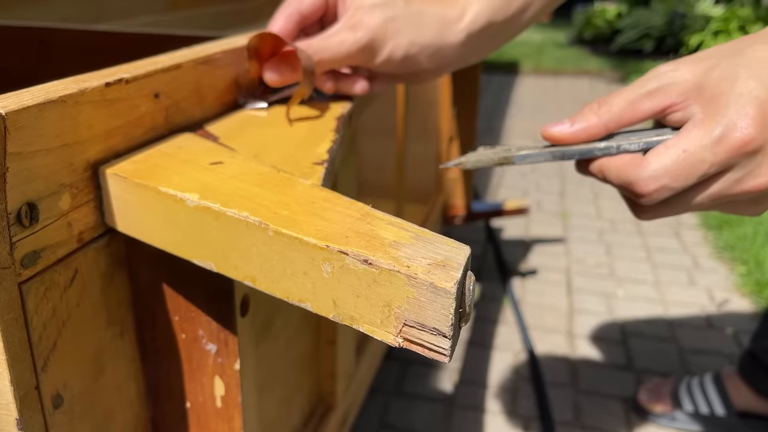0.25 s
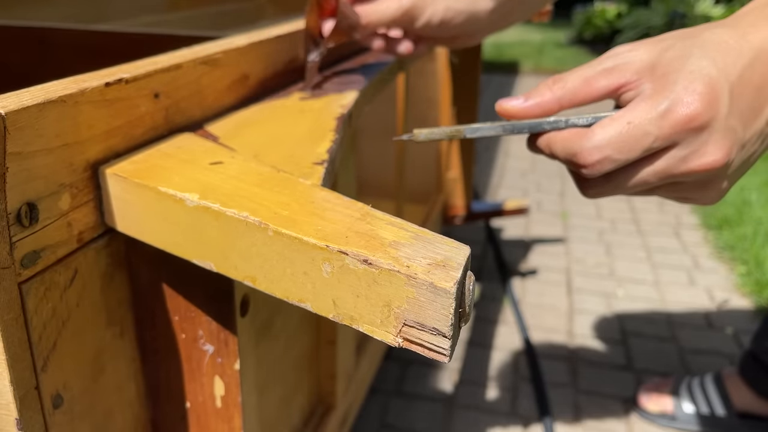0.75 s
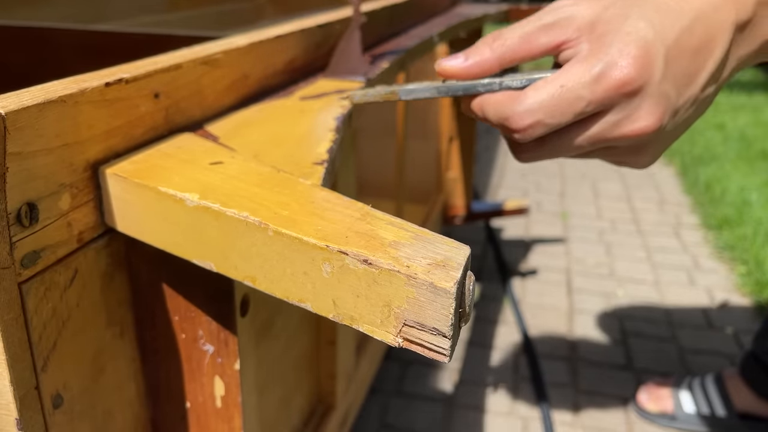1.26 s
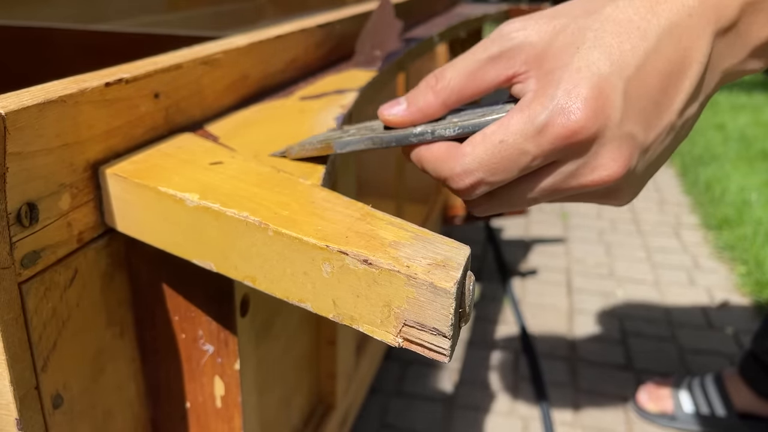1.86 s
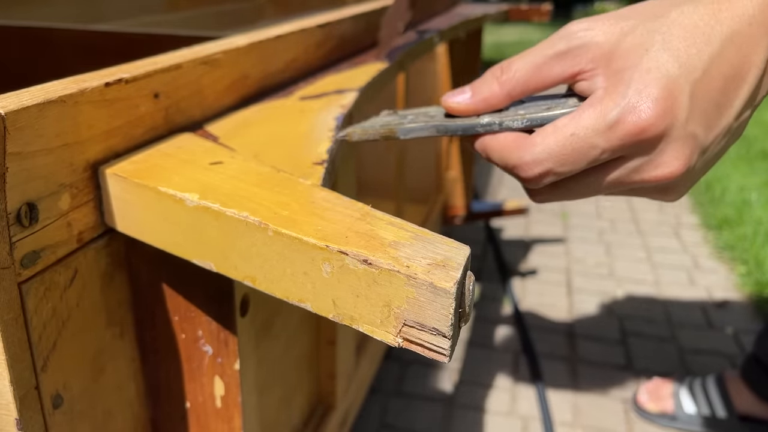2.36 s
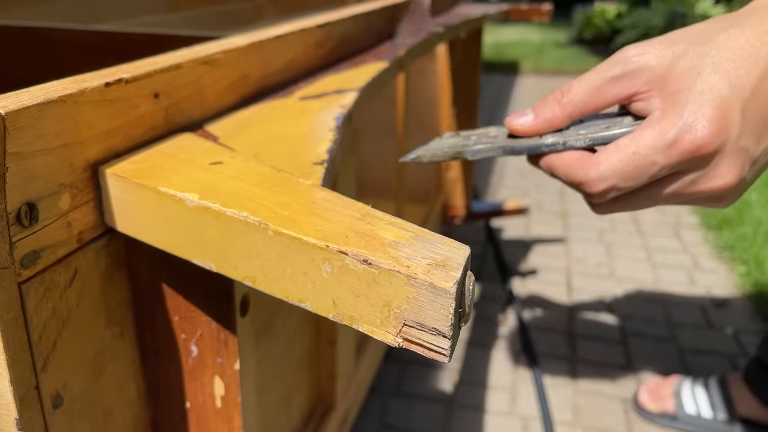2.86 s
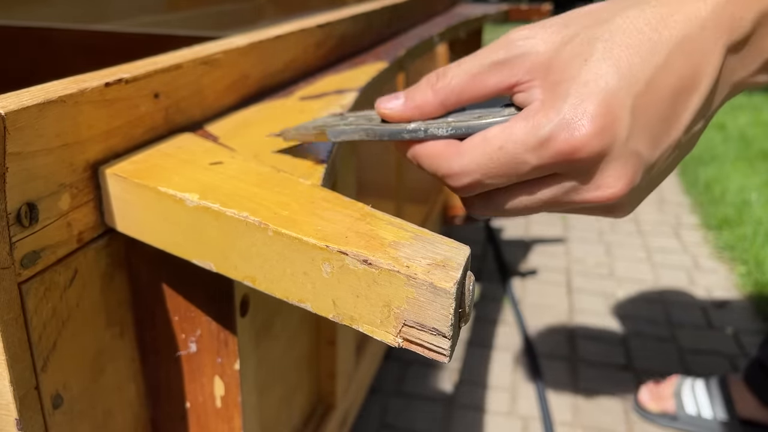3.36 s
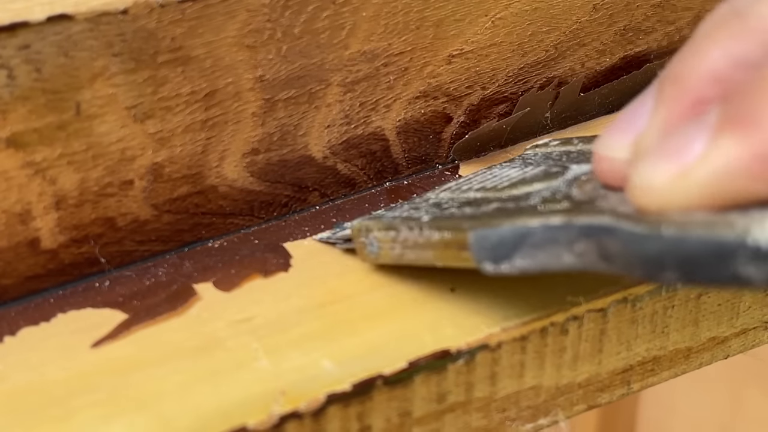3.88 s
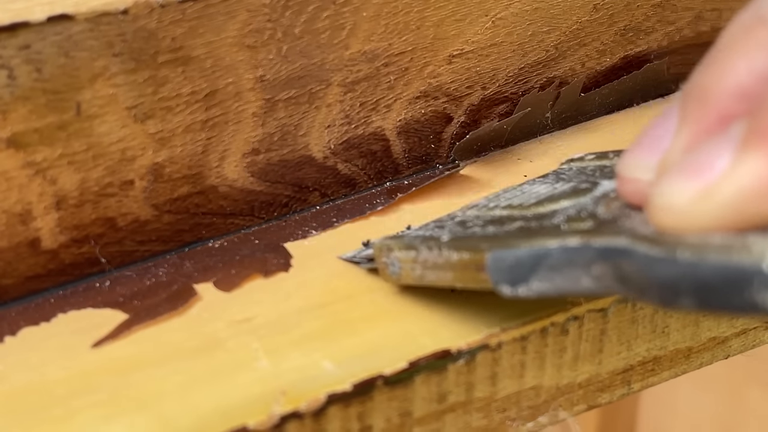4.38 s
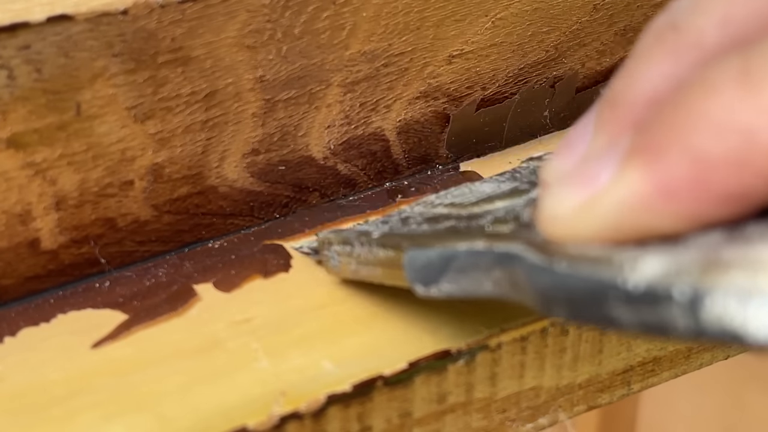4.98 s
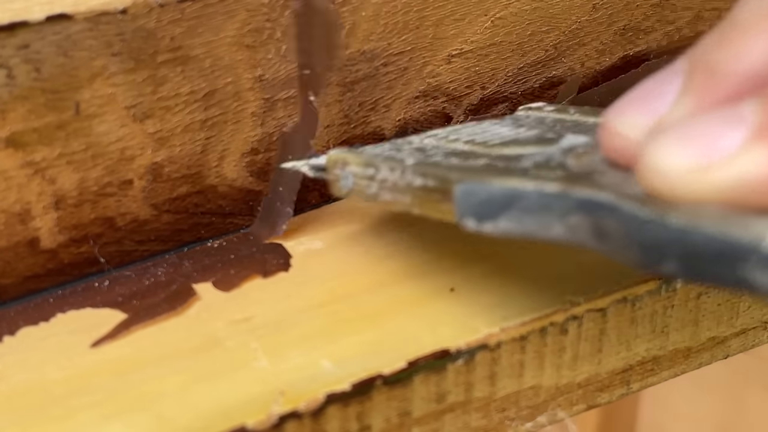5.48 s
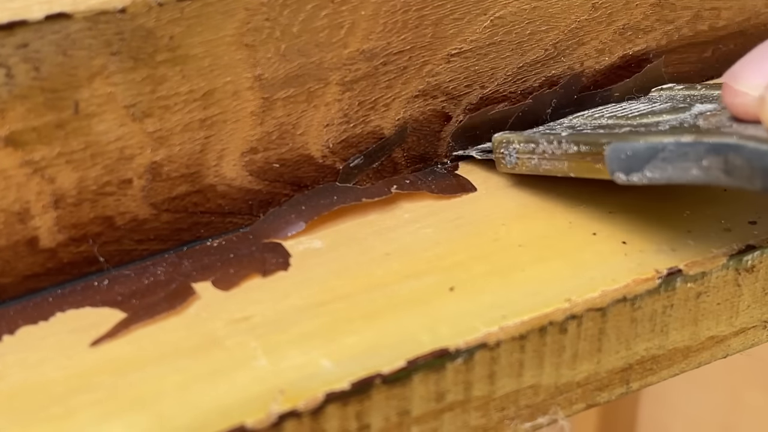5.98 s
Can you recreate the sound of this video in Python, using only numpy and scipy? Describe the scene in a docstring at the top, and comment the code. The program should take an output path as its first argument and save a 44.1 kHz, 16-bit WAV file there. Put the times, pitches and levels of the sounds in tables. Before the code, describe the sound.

Brittle old finish crackles and ticks as it peels off wood, then a razor scraper grinds in quick short strokes with sharp snaps and wooden knocks.

```python
"""Outdoors, over faint hiss and a low rumble that swells in places as the piece is handled, a strip of brittle old
finish is peeled by hand off a wooden frame: beds of tiny cracks swell and fade under single loud ticks. Then a razor
scraper works in quick strokes: a grinding push of gritty noise, snapping flakes (bursts with a brief ring), a jolt
that booms through the wood's decaying modes, and a light draw-back that hisses and squeaks. Two close microphone
ports hear it all."""
import sys
import numpy as np
from scipy import signal
from scipy.fft import rfft, irfft, next_fast_len
from scipy.io import wavfile
from scipy.ndimage import map_coordinates

SR = 44100
rng = np.random.default_rng(int(sys.argv[2]) if len(sys.argv) > 2 else 0)


def generate_wav(signal):
    """Clip the signal to [-1, 1] and save it as 16-bit WAV at the path in sys.argv[1]."""
    frames = np.transpose(np.atleast_2d(signal))
    scaled = np.clip(frames, -1, 1) * 32767
    pcm = np.round(scaled).astype(np.int16)
    wavfile.write(sys.argv[1], SR, pcm)


N = 274743


def amp(db):
    """Decibels to gain."""
    return 10 ** (np.asarray(db) / 20)


def unit(x):
    """Scaled to rms 1."""
    return x / np.sqrt(np.mean(x ** 2) + 1e-20)


def along(points, hz):
    """(Hz, value) points read on a log frequency axis."""
    f, value = np.transpose(points)
    return np.interp(np.log(hz + 1), np.log(f + 1), value)


def curve(rows):
    """(s, value) rows, one value per sample."""
    return np.interp(np.arange(N) / SR, *np.transpose(rows))


def wobble(rate, size):
    """A smooth random curve, rate knots a second."""
    knots = rng.standard_normal(int(size * rate / SR) + 4)
    return map_coordinates(knots, [np.arange(size) * rate / SR])


def filtered(x, response):
    """x times a response of frequency."""
    n = x.shape[-1]
    m = next_fast_len(n + 4096)
    return irfft(rfft(x, m) * response(np.fft.rfftfreq(m, 1 / SR)), m)[..., :n]


def struck(x, level_db):
    """A short sound through a causal (minimum-phase) colour: nothing rings before the blow."""
    n = len(x)
    cepstrum = irfft(np.log(amp(level_db(np.fft.rfftfreq(n, 1 / SR)))), n)
    cepstrum[1:n // 2] *= 2
    cepstrum[n // 2 + 1:] = 0
    return irfft(rfft(x) * np.exp(rfft(cepstrum)), n)


def add(track, s, sound):
    """Mix a sound in at time s."""
    part = track[max(round(s * SR), 0):][:len(sound)]
    part += sound[:len(part)]


def grit(size, rate, spread_db, smooth):
    """Tiny fractures of scattered size, rate a second, over smooth friction noise."""
    hits = (rng.random(size) < rate / SR) * rng.choice([-1, 1], size)
    cracks = hits * amp(spread_db * np.clip(rng.standard_normal(size), -2, 2))
    return unit(cracks) + smooth * rng.standard_normal(size)


def fractures(rows, spectrum, t60, tail_db, tail_t60, ring_db=-7.5, ring_t60=0.019):
    """Each break is a burst of a few ms with a faint tail; flakes with a given pitch also ring briefly."""
    out, t = np.zeros(N), np.arange(4096) / SR

    def early(x):
        """Scaled to rms 1 over the first 3 ms."""
        return x / np.sqrt(np.mean(x[t < .003] ** 2))

    for s, db, body_db, top_db, *flake_hz in rows:
        length = t60 * amp(np.clip(body_db, -25, 6) / 5)  # less body breaks faster
        decay = amp(-60 * t / length) + amp(tail_db - 60 * t / tail_t60)
        burst = rng.standard_normal(len(t)) * decay
        shade = [(3200, body_db), (5500, 0), (8500, 0), (10500, top_db)]
        crack = early(struck(burst, lambda hz: along(spectrum, hz) + along(shade, hz)))
        for hz in flake_hz:
            ring = np.sin(2 * np.pi * hz * t) * amp(-60 * t / ring_t60)
            crack = early(crack + amp(ring_db) * early(ring))
        add(out, s, amp(db) * crack)
    return out


# colour of the outdoor rumble and hiss: [f/Hz, relative level per Hz/dB]
AIR_COLOUR = [(20, -18), (35, -9), (60, 0), (150, -12), (240, -22), (350, -30), (900, -34), (2500, -38.5),
              (6500, -41.5), (10700, -34.3), (12000, -46), (13000, -62)]
# slow rise and fall of the low rumble: [t/s, level/dB], a random wobble rides on top
RUMBLE_LEVEL = [(0, -2.5), (0.6, 3.5), (1.3, 2), (1.42, -2.5), (3.48, -3), (3.62, 6.5), (4.2, 3),
                (5.65, 9.5), (6.2, 1)]


def outdoors(level_db=-43):
    """Low rumble, swelling in places as the piece is handled, under a steady hiss; a little differs between ports."""
    noise = rng.standard_normal((2, N))
    common, apart = filtered(noise, lambda hz: amp(along(AIR_COLOUR, hz)) / (1 + (24 / (hz + 1)) ** 4))
    scale = amp(level_db) / np.std(common)  # set before the rumble swells
    rumble = filtered(common, lambda hz: 1 / (1 + (hz / 160) ** 4))
    common = common + rumble * (amp(curve(RUMBLE_LEVEL) + wobble(1.77, N)) - 1)
    apart_db = [(100, -18), (400, -9), (1500, -5), (5000, -8), (9000, -22)]
    apart = filtered(apart, lambda hz: amp(along(apart_db, hz)))
    return scale * common, scale * apart


def boards(x, level_db=-17, t60=0.085, dull_hz=7000):
    """Nearby boards scatter a brief reflection, different at each port."""
    t = np.arange(SR // 8) / SR
    tail = rng.standard_normal((2, len(t))) * amp(-60 * t / t60) * (t > .002)
    tail = filtered(tail / np.linalg.norm(tail[0]), lambda hz: 1 / (1 + (hz / dull_hz) ** 2))
    return amp(level_db) * signal.fftconvolve(x[None], tail, axes=1)[:, :N]


# soft thumps as the hand settles: [t/s, level before the soft onset and decay/dB]
HAND_THUMPS = [(2.03, -46), (3.452, -38)]


def thumps(rise=0.0049, t60=0.17):
    """A soft contact is a dull puff of noise with no crack."""
    out, t = np.zeros(N), np.arange(SR // 4) / SR
    dull_db = [(150, -6), (420, 5), (900, -9.5), (2500, -19), (4500, -28), (12000, -60)]
    for s, db in HAND_THUMPS:
        puff = unit(filtered(rng.standard_normal(len(t)), lambda hz: amp(along(dull_db, hz))))
        add(out, s, puff * (1 - np.exp(-t / rise)) * amp(db - 60 * t / t60))
    return out


# crackling and rustling swells: pulls on the strip, and at 5.4 s a scraped flake curling up:
# [peak t/s, rise/s, fall/s, crackle level/dB, rustle level/dB], levels before the fast random wobble
CRACKLE_SWELLS = [(0.013, 0.036, 0.051, -30.5, -40), (0.21, 0.1, 0.046, -42, -49),
                  (0.3, .1, 0.34, -44, -69), (0.54, 0.12, 0.17, -42.5, -70), (0.7, 0.063, 0.13, -35, -54),
                  (1.19, 0.18, 0.065, -35.5, -47), (1.63, 0.06, 0.15, -49, -56.5),
                  (1.97, .14, 0.11, -48.5, -55.5), (2.14, 0.054, 0.1, -49, -60),
                  (5.425, 0.022, 0.054, -44, -44)]
# colour of the crackling: [f/Hz, relative level per Hz/dB]
CRACKLE_COLOUR = [(300, -9), (900, -20), (1600, -19.5), (2700, -17), (4000, -14.5), (6500, -6.5), (8300, 2),
                  (10700, 7), (12000, -4), (13500, -23), (16000, -48)]
# colour of the curl's rustle: [f/Hz, relative level per Hz/dB]
RUSTLE_COLOUR = [(500, 9), (1100, 10.5), (1750, 17.5), (2400, 7), (3500, 18.5), (5500, 25), (7000, 10),
                 (9000, 7), (14000, 9.5)]
SWELL_DROP_DB = 8.5  # both beds lie this far under their peak one rise before it and one fall after it


def peeling():
    """Finish letting go crackles in a dense run of tiny cracks, swelling and fading; its curl radiates a lower rustle."""
    cracks = grit(N, rate=590, spread_db=5.0, smooth=0.17)
    crackle = unit(filtered(cracks, lambda hz: amp(along(CRACKLE_COLOUR, hz))))
    shivers = grit(N, rate=990, spread_db=13.5, smooth=0.2)
    rustle = unit(filtered(shivers, lambda hz: amp(along(RUSTLE_COLOUR, hz))))
    peak, rise, fall, crackle_db, rustle_db = np.transpose(CRACKLE_SWELLS)[:, :, None]
    t = np.arange(N) / SR - peak
    slack_db = SWELL_DROP_DB * np.maximum(-t / rise, t / fall)

    def level(peak_db):
        """The strongest swell at each moment sets the gain."""
        return amp(np.max(peak_db - slack_db, axis=0))

    return (crackle * level(crackle_db) + rustle * level(rustle_db)) * amp(2.35 * wobble(69.74, N))


# the loudest cracks of the bending strip: [t/s, level before a common trim/dB, body/dB]
STRIP_CRACKS = [(0.0287, -18.5, 5), (0.0469, -26, 9.5), (0.128, -28.5, 7.5), (0.1455, -22, 3),
                (0.1554, -27, 6), (0.163, -26.5, 3), (0.1964, -25.5, 2.5), (0.2011, -25, -2),
                (0.2166, -18.5, 0), (0.3998, -24.5, -7), (0.5478, -24, -8), (0.565, -26, -7),
                (0.6673, -23, 0), (0.676, -26, -5), (0.7164, -28, -4), (1.121, -25.5, -30),
                (1.182, -26.5, 0), (1.3886, -39, 5), (1.6117, -32.5, 6), (1.637, -31, 1), (1.6786, -38, 7),
                (1.951, -28.5, -49), (2.0097, -34, -5), (2.4601, -35, 4.5)]
# colour of one crack before its own body and treble: [f/Hz, relative level per Hz/dB]
CRACK_COLOUR = [(300, -26), (900, -33), (1600, -21.5), (2700, -14), (4000, -13.5), (6500, -2.5), (8300, 0),
                (10700, 6.5), (12000, -3), (13500, -14), (16000, -32)]
TICK_TOP_DB, TICK_THINNING = 0, .3  # treble of a crack, and the dB it gains per dB less body


def ticks():
    """Single cracks of the strip: the less body, the brighter."""
    rows = [(s, db, body_db, TICK_TOP_DB - TICK_THINNING * body_db) for s, db, body_db in STRIP_CRACKS]
    return amp(-2) * fractures(rows, CRACK_COLOUR, t60=0.0094, tail_db=-26, tail_t60=0.084)


# resonances of the wooden frame: [f/Hz, level/dB, t60/s]; a jolt scatters pitch and level a little
FRAME_MODES = [(101.8, 9, 0.25), (141.9, 6.5, 0.67), (167.8, 3.5, 0.28), (226.7, 8, 0.29),
               (278, -1.5, 0.42), (349.6, -3, 0.32), (414.7, -3.5, 0.17), (458, -6, 0.11), (577, 0.5, 0.13),
               (660, -0.5, 0.11), (742, -19, 0.23), (785, -11, 0.11), (885.5, -3.5, 0.1), (1033, -8, 0.068),
               (1385, -11, 0.068), (1777, -10.5, 0.022)]


def frame_response(hz):
    """The frame's resonances under steady rubbing: the longer a mode rings, the narrower its peak."""
    total = 0
    for k, (f, db, t60) in enumerate(FRAME_MODES):
        width = np.log(1000) / np.pi / t60
        total = total + (-1) ** k * amp(db) * 1j * hz * width / (f * f - hz * hz + 1j * hz * width)
    return total


# colour of the wood as light rubbing drives it: [f/Hz, gain/dB]
MURMUR_COLOUR = [(100, -5.5), (300, 7), (600, -8), (900, 1.5), (1800, -4.5), (3000, -3), (6000, -48)]


def murmur(force):
    """The frame's answer to rubbing, at rms 1."""
    return unit(filtered(force, lambda hz: frame_response(hz) * amp(along(MURMUR_COLOUR, hz))))


# colour of the rubbing edge: [f/Hz, relative level per Hz/dB]
EDGE_COLOUR = [(400, -11), (1200, -39), (2300, -12.5), (3000, -8.5), (3800, -6.5), (4600, -6), (5600, -5.5),
               (8000, -7.5), (10700, -2.5), (12000, -11.5), (13500, -36), (16000, -57)]
# resonances of the steel scraper: [f/Hz, width/Hz, lift/dB]
STEEL_MODES = [(2250, 480, 14.5), (3730, 210, 10), (5200, 220, 1), (8000, 690, 5)]


def steel_db(hz):
    """The rasp of the edge, lifted where the scraper rings."""
    lift = sum(db / (1 + (2 * (hz - f) / width) ** 2) for f, width, db in STEEL_MODES)
    return along(EDGE_COLOUR, hz) + lift


def stroke(start, end, first_db, last_db, edge, chatter_db):
    """The level of one blade stroke: soft ends, a steady change of pressure, uneven grip."""
    t = np.arange(int((max(end - start, .005) + edge) * SR)) / SR
    gate = np.clip(np.minimum(t, t[-1] - t) / edge, 0, 1)
    return gate * amp(np.linspace(first_db, last_db, len(t)) + chatter_db * wobble(179.0, len(t)))


# scraper strokes; the blade pushes, jolts into the wood, rests and is drawn back:
# [jolt t/s, push before it/s, rasp level/dB, rasp swell/dB, boom level/dB, knock level/dB,
#  rest/s, draw-back level/dB, draw-back swell/dB, first ring f/Hz]
BLADE_STROKES = [(3.597, .028, -37, 9, -40.5, -43, 0.083, -41.5, 5, 3700),
                 (3.821, .04, -40.5, 14, -39, -44, 0.069, -38.5, 9, 4660),
                 (4.027, 0.037, -43.5, 15, -45.5, -45.5, 0.088, -51, -9, 8600),
                 (4.227, 0.038, -44, 14, -28, -41, 0.099, -53, 5, 8100),
                 (4.442, 0.031, -35, 32, -23, -30, 0.074, -49.5, -1, 9000),
                 (4.673, .042, -36.5, -4, -25.5, -24.5, 0.051, -52.5, 18, 8900),
                 (4.874, .049, -38.5, 18.5, -26.5, -25.5, 0.06, -45.5, -21, 9500),
                 (5.05, .035, -43, 17, -24, -24, .08, -48.5, 9, 9150),
                 (5.247, .018, -32, -8, -24.5, -24, .158, -38.5, -9, 6450),
                 (5.861, 0.027, -39.5, 26, -25.5, -34.5, .105, -52, -3, 7900),
                 (6.204, 0.0044, -42, 0, -31, -65, .08, -50, 0, 8300)]
BACK_S, BACK_WOOD_DB = 0.057, -47  # length of a draw-back, and the frame's murmur under it
FLAT_HZ, GLIDE = 7860, 0.6  # ring of the flat blade, and the share of the way the ring glides to it


def draw_backs():
    """After each jolt and a short rest, the blade slides back lightly and flattens, so its ring glides."""
    rows = []
    for s, *_, rest, db, swell_db, hz in BLADE_STROKES:
        start = s + rest
        last_hz = hz + GLIDE * (FLAT_HZ - hz)
        rows.append((start, start + BACK_S, db - swell_db / 2, db + swell_db / 2, hz, last_hz, BACK_WOOD_DB))
    return rows


# the blade slides up to a flake:
# [start t/s, end t/s, first level/dB, last level/dB, first ring f/Hz, last ring f/Hz, wood level/dB]
APPROACH_SLIDES = [(3.981, 4.018, -46, -37, 6030, 4620, -46), (5.729, 5.855, -53, -47.5, 8100, 7500, -45)]


def slides(edge=0.014, ring_db=-3.0, width_hz=650, tilt_db=5.5):
    """Light contact gives a thinner hiss with a squeaky ring that glides as the blade's angle changes."""
    out = np.zeros(N)
    for start, end, first_db, last_db, first_hz, last_hz, wood_db in APPROACH_SLIDES + draw_backs():
        level = stroke(start, end, first_db, last_db, edge, chatter_db=2.0)
        force = grit(len(level), rate=1500, spread_db=0.5, smooth=0.84)
        # tilt_db per octave brightens the rasp into a hiss
        hiss = unit(filtered(force, lambda hz: amp(steel_db(hz) + tilt_db * np.log2(hz / first_hz + .01))))
        noise = rng.standard_normal(len(level))
        flutter = unit(filtered(noise, lambda hz: 1 / (1 + (hz / width_hz) ** 2)))
        phase = 2 * np.pi * np.cumsum(np.linspace(first_hz, last_hz, len(level))) / SR
        ring = unit(flutter * np.sin(phase))
        wood = amp(wood_db) * unit(level) * murmur(force)
        add(out, start - edge / 2, level * unit(hiss + amp(ring_db) * ring) + wood)
    return out


WOOD_DB, WOOD_GROWS = 20.5, 0.45  # murmur over the rasp at a 0 dB knock, and dB per dB of knock
OVERRUN_S = .011  # a push runs on just past the jolt


def pushes(edge=.012):
    """The edge grinds through the finish as its pressure changes; the frame murmurs more before a hard knock."""
    out = np.zeros(N)
    for s, lead, rasp_db, swell_db, _, knock_db, *_ in BLADE_STROKES:
        first_db, last_db = rasp_db - swell_db / 2, rasp_db + swell_db / 2
        level = stroke(s - lead, s + OVERRUN_S, first_db, last_db, edge, chatter_db=1.0)
        force = grit(len(level), rate=1500, spread_db=3.5, smooth=0.76)
        rasp = unit(filtered(force, lambda hz: amp(steel_db(hz))))
        wood = unit(level) * amp(rasp_db + WOOD_DB + WOOD_GROWS * knock_db) * murmur(force)
        add(out, s - lead - edge / 2, level * rasp + wood)
    return out


# colour of the frame's dense, unresolved ring: [f/Hz, relative level per Hz/dB]
DENSE_COLOUR = [(40, -14), (75, 2), (130, 0.5), (220, 11), (330, -2.5), (650, -10), (1100, -9), (1800, -13),
                (3000, -23), (6000, -25)]
# how long that dense ring lasts: [f/Hz, t60/s]
DENSE_DECAY = [(80, 0.36), (200, 0.33), (500, 0.21), (1200, 0.086), (3000, 0.026)]


def jolts(build=0.018, dense_db=-7.5, split_hz=320, sweep_db=-8, sweep_hz=340, sweep_fall=0.074, sweep_t60=0.6):
    """Bending waves travel slower the lower they are: the knock comes first, the boom swells and sinks after it."""
    out, t = np.zeros(N), np.arange(SR // 2) / SR

    def life(hz, t60, t):
        """Build-up, slower for low pitches, then decay."""
        return (1 - np.exp(-(t / build) ** 2 * (hz / 200) ** 3)) * amp(-60 * t / t60)

    for s, _, _, _, boom_db, knock_db, *_ in BLADE_STROKES:
        ring = np.zeros(len(t))
        for hz, db, t60 in FRAME_MODES:
            gain = amp(db + rng.normal(0, 1.12))
            cycles = hz * rng.normal(1, 0.0062) * t + rng.random()
            ring += gain * life(hz, t60, t) * np.sin(2 * np.pi * cycles)
        hz, age, z = signal.stft(rng.standard_normal(len(t)), SR, nperseg=256)
        hz = hz[:, None]
        z = z * amp(along(DENSE_COLOUR, hz)) * life(hz, along(DENSE_DECAY, hz), age)
        dense = signal.istft(z, SR)[1][:len(t)]
        pitch = sweep_hz * np.exp(-t / sweep_fall)
        sweep = np.sin(2 * np.pi * np.cumsum(pitch) / SR)
        sweep = life(sweep_hz, sweep_t60, t) / (1 + (55 / pitch) ** 6) * sweep  # fades as it sinks past 55 Hz
        wood = unit(ring) + amp(dense_db) * unit(dense) + amp(sweep_db) * unit(sweep)
        boom = filtered(wood, lambda hz: 1 / (1 + (hz / split_hz) ** 8))
        knock = wood - boom
        boom = boom / np.std(boom[t < .1])
        knock = knock / np.std(knock[t < .04])
        add(out, s, amp(boom_db) * boom + amp(knock_db) * knock)
    return out


# the loudest flakes snapping under the blade:
# [t/s, level before a common trim/dB, body/dB, top/dB, flake's ring f/Hz]
FLAKE_SNAPS = [(3.5876, -21, -10, -22, 7070), (4.0216, -15, -4.5, -0.5, 8670),
               (4.2257, -17, 13.5, -2, 9300), (4.2953, -21.5, 8, -2.5, 8200), (4.4389, -9.5, -12, -5, 3960),
               (4.4493, -12.5, 14, 1.5, 3950), (4.4576, -20, 11, -15, 1760), (4.4858, -26.5, 11, 2, 9300),
               (4.4938, -24.5, 8.5, -4, 5450), (4.6682, -15, -15, -2.5, 9100), (4.6727, -17, 11, -7, 5840),
               (4.868, -16.5, -9, 0.5, 9900), (4.8732, -15.5, -25, 31, 8240), (5.0474, -22, -12, -5, 5770),
               (5.074, -35, -14, -5, 8100), (5.1096, -26, 5, 9.5, 9800), (5.226, -18.5, 10.5, 2, 5630),
               (5.2332, -13, 12, 0.5, 9700), (5.2449, -13, 6, 6, 7980), (5.2495, -15.5, 16.5, -24, 1780),
               (5.3981, -13, 10, -2.5, 7750), (5.4191, -22.5, 6.5, -13, 7400), (5.433, -31, 9, -6, 4900),
               (5.7281, -16, 5, -9, 3700), (5.8602, -19.5, -1, 2.5, 9300), (5.8807, -31, 16, -2, 3700),
               (5.907, -31.5, 4, -9, 3940), (5.9464, -11.5, 15, 1, 2100), (5.9751, -20.5, 17, 0, 9100),
               (5.9869, -21.5, 17.5, 0.5, 8360), (6.0002, -28, 26, 1, 2230),
               (6.2008, -20.5, 10.5, -12, 6920)]
# colour of a breaking flake before its own body and top: [f/Hz, relative level per Hz/dB]
SNAP_COLOUR = [(200, -52), (700, -20), (1200, -23), (2000, -13), (2900, -19.5), (3900, -9), (4700, -2.5),
               (6500, -1.5), (8200, 1.5), (10500, 10.5), (12000, 3), (14000, -14.5), (16000, -20)]
# a smaller chip follows: median delay (s), its scatter (log units), mean level re the snap (dB), median ring (Hz)
CHIP_AFTER_S, CHIP_SCATTER, CHIP_DB, CHIP_HZ = .013, .6, -21, 8800


def flakes():
    """Flakes snap off, each followed by a small chip of the same stuff."""
    chance = rng.standard_normal((len(FLAKE_SNAPS), 3))
    chips = []
    for (s, db, body_db, top_db, _), (late, loud, high) in zip(FLAKE_SNAPS, chance):
        chip_s = s + CHIP_AFTER_S * np.exp(CHIP_SCATTER * late)
        chip_db = db + CHIP_DB + 2 * loud
        chips.append((chip_s, chip_db, body_db, top_db, CHIP_HZ * np.exp(0.136 * high)))
    return amp(-.5) * fractures(FLAKE_SNAPS + chips, SNAP_COLOUR, t60=.0065, tail_db=-17, tail_t60=.03)


# phase gap between the two ports: [f/Hz, lead of the left/rad]
PORT_LEAD = [(20, 0), (150, .15), (300, .4), (600, .6), (1600, -.4), (3400, .7), (6500, .25), (7700, .7),
             (8600, 0), (10300, -3.14), (11800, -6.1), (13500, -9.2), (15200, -12.5)]


def ports(x, side):
    """The two ports hear one sound, its balance set by side, with a phase gap that grows in the high treble."""
    def gap(hz):
        """Half the gap, given to the left and taken from the right."""
        return amp(along(side, hz) / 2) * np.exp(.5j * along(PORT_LEAD, hz))

    return filtered(x, lambda hz: np.array([gap(hz), 1 / gap(hz)]))


# where the peeling, the blade and the outdoor air sit: [f/Hz, left minus right level/dB]
STRIP_BALANCE = [(500, 9.5), (2200, 13.5), (4500, 7), (6000, 4.5), (7300, 4), (9000, 0.5)]
BLADE_BALANCE = [(100, 2.5), (280, 0.8), (400, 0), (650, 6), (1100, 4.5), (2200, -0.5), (10000, 0)]
AIR_BALANCE = [(100, 1.2), (900, 3.5), (3000, 1), (7000, 4), (9000, 0)]


def scene():
    """Peeling, then scraping, in the open air."""
    air, apart = outdoors()
    strip = peeling() + ticks()
    blade = thumps() + slides() + pushes() + jolts() + flakes()
    background = ports(air, AIR_BALANCE) + np.array([apart, -apart])
    direct = ports(strip, STRIP_BALANCE) + ports(blade, BLADE_BALANCE)
    return background + boards(strip + blade) + direct


TOP_HZ = 16700  # band limit


def record(dry):
    """The sharpest peaks are rounded off, and nothing is kept above the band limit."""
    rounded = dry / (1 + (dry / .85) ** 6) ** (1 / 6)
    return filtered(rounded, lambda hz: hz < TOP_HZ)


dry = scene()
out = record(dry)
generate_wav(out)
```